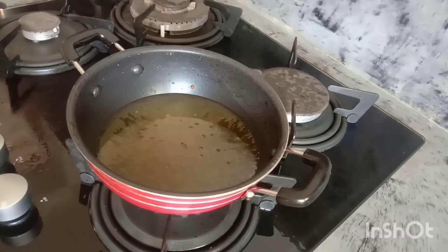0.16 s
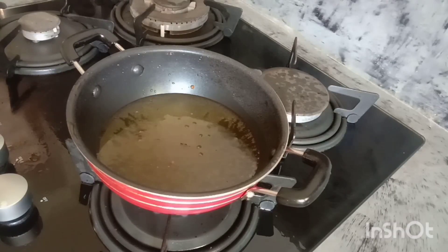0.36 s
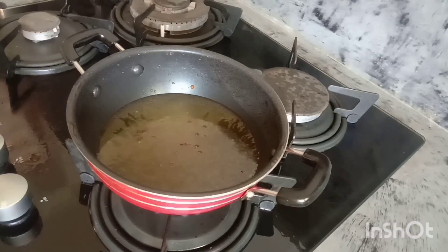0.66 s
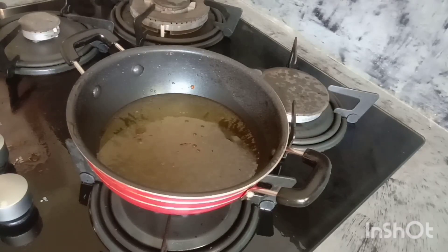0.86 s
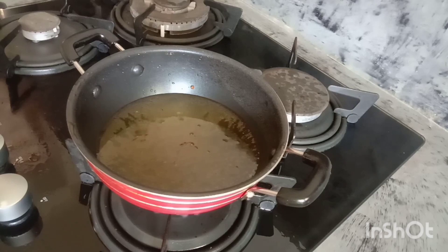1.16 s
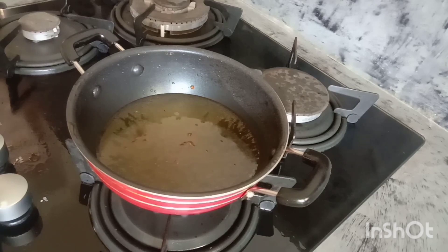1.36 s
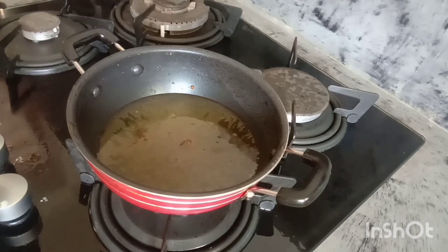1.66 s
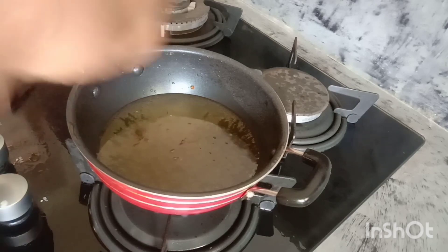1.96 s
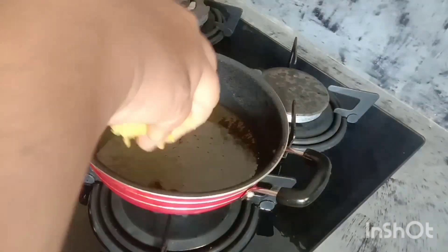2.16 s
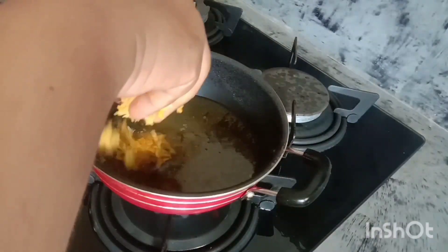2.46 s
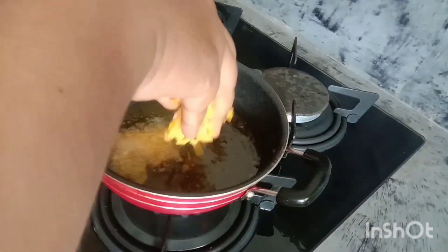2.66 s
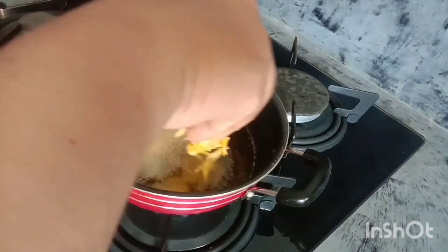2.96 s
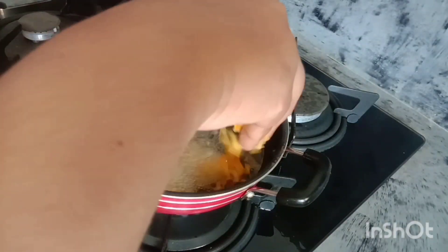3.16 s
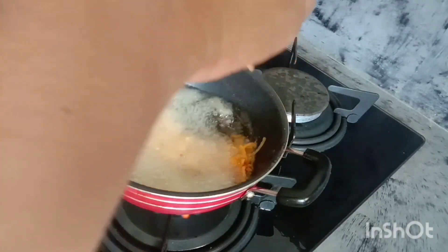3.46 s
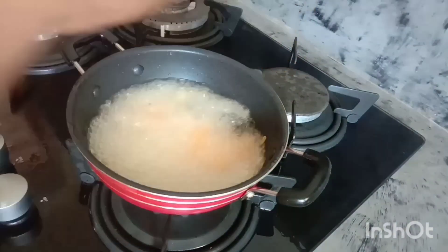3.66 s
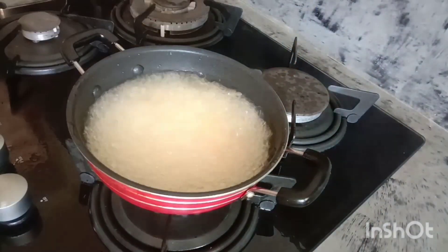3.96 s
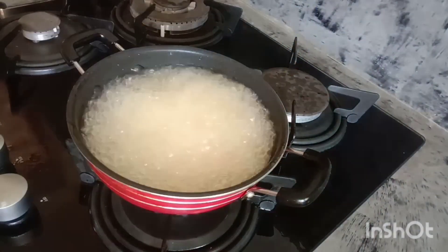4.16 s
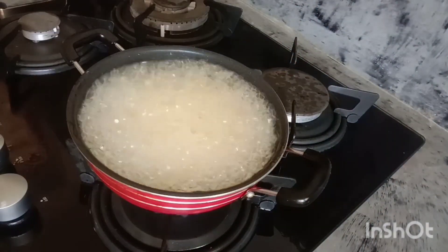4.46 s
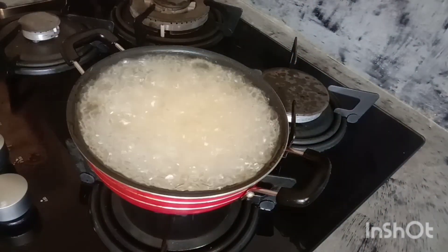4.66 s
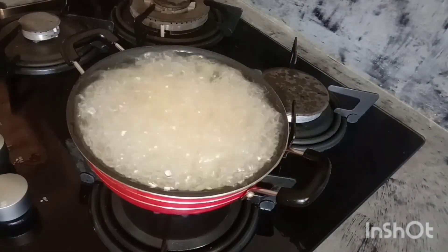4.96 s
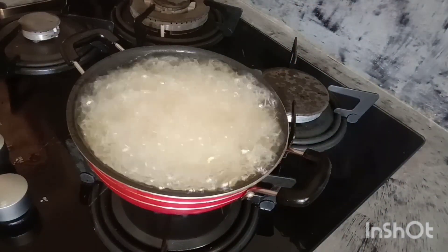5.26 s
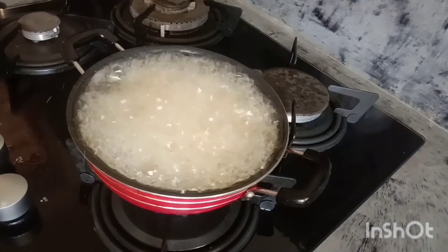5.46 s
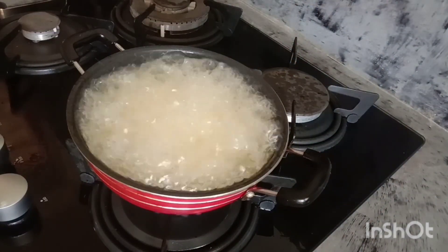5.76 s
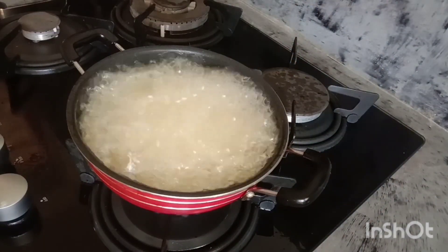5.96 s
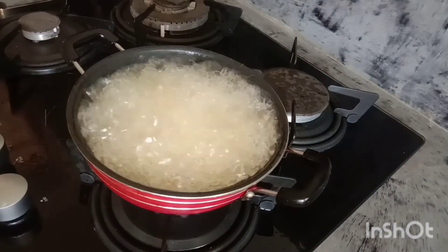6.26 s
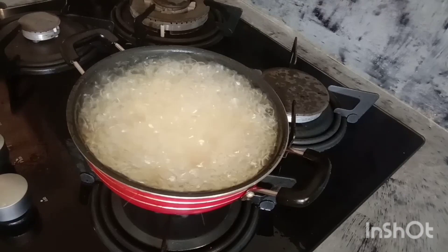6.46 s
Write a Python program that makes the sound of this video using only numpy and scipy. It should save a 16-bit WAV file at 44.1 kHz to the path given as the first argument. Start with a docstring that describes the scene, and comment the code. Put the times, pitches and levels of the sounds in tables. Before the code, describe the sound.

A scolding bird rasps over a faint gas burner; wet grated vegetable sputters into oil, foams and fizzes densely as an engine throb swells.

```python
"""From the start a gas burner hisses under hot oil, an engine outside throbs and slowly speeds up, and loud rasping
chirps, probably a scolding bird, ring in the hard-walled kitchen about twice a second: squeaks and hoarse notes.
Around 2 s grated radish drops into the pan and sputters; from 3.5 s the last handful flashes into a hiss and foams
up into soft, dense bubbling and fizz, built from thousands of short rings, with big bubbles and rushes standing out.
Shaped noise makes the burner and the rasp, wavering harmonics the engine; one dull microphone hears it all."""
import sys
import numpy as np
from scipy import signal
from scipy.fft import rfft, irfft
from scipy.io import wavfile
from scipy.ndimage import uniform_filter1d

SR = 44100
rng = np.random.default_rng(int(sys.argv[2]) if len(sys.argv) > 2 else 0)


def generate_wav(sig):
    """Save sig (samples, or channels by samples) to the path in sys.argv[1] as 16-bit PCM at SR."""
    pcm = np.round(np.clip(np.atleast_2d(sig).T, -1, 1) * 32767).astype(np.int16)
    wavfile.write(sys.argv[1], SR, pcm)


N = 292030
T = np.arange(N) / SR  # s


def undb(db):
    """Turn decibels into an amplitude gain."""
    return 10 ** (np.asarray(db) / 20)


def unit(x):
    """Scale to an rms of 1."""
    return x / np.sqrt(np.mean(np.abs(x) ** 2))


def spectrum_db(hz, points):
    """Read a curve of (f/Hz, level/dB) points on a log-frequency axis, flat beyond its ends."""
    f, db = np.transpose(points)
    return np.interp(np.log(np.maximum(hz, 1)), np.log(f), db)


def colour(x, points):
    """Filter a sound by the curve of the points and set it to an rms of 1."""
    gain = undb(spectrum_db(np.fft.rfftfreq(N, 1 / SR), points))
    return unit(irfft(rfft(x) * gain, N))


def walk(rate):
    """Smooth random drift of rms 1 that changes about rate times a second."""
    k = max(int(SR / rate), 1)
    smooth = uniform_filter1d(rng.standard_normal(N), k, mode="wrap")
    return unit(uniform_filter1d(smooth, k, mode="wrap"))


def scatter(width_hz, order):
    """Random amplitude and phase that smear a tone into a band of the given width."""
    noise = rng.standard_normal(N) + 1j * rng.standard_normal(N)
    lowpass = signal.butter(order, width_hz / 2, fs=SR, output="sos")
    return unit(signal.sosfilt(lowpass, noise))


def swell(t, length, rise, fall):
    """Grow softly, hold until length, then die away exponentially."""
    grow = 1 - np.exp(-(np.maximum(t, 0) / rise) ** 2)
    return grow * np.exp(-np.maximum(t - length, 0) / fall)


def bubbles(count, low_hz, high_hz, cycles, spread_db, glide):
    """Short ringing bubbles of random size, each rising in pitch as it nears the surface."""
    when, pitch, size = rng.random((count, 3)).T[:, :, None]
    hz = low_hz + (high_hz - low_hz) * pitch
    n = np.arange(int(cycles * SR / low_hz))
    age = n * hz / SR / cycles  # 1 after the given number of cycles
    envelope = (1 - np.exp(-age / 0.11)) * np.exp(-5 * age)
    ring = envelope * np.sin(2 * np.pi * cycles * age * (1 + glide * age / 2))
    gain = undb(-spread_db * np.log(1 - .995 * size)) * np.sqrt(hz)
    places = (when * N).astype(int) + n
    return np.bincount(places.ravel(), (gain * ring).ravel(), N)[:N]


def burner(tone_hz=476, tone_db=-68, jet_hz=1238, jet_db=-74):
    """The gas flame's low rush is shaped noise, with a faint wavering tone and a breathy ring from the jet."""
    # colour of the rush: f/Hz, relative level/dB
    rush_colour = [(20, -15.5), (45, -23.5), (75, -0.5), (130, 0.5), (250, 2), (420, 0), (560, -3),
                   (720, -9), (1700, -12), (2500, -20.5), (4000, -32.5), (7500, -50), (9000, -28.5),
                   (14000, -23)]
    # moments when the flame's tone swells: t/s, length/s, level/dB
    tone_swells = [(0.402, 0.054, -55), (0.535, 0.062, -56.5), (1.178, 0.044, -51.5)]
    rush = colour(rng.standard_normal(N), rush_colour) * undb(-56 + walk(rate=24))
    tone = np.real(scatter(width_hz=11.5, order=2) * np.exp(2j * np.pi * tone_hz * T))
    jet = np.real(scatter(width_hz=68, order=2) * np.exp(2j * np.pi * jet_hz * T))
    faint_tone = undb(tone_db) * unit(tone * undb(4 * walk(rate=36.0)))
    breathy_jet = undb(jet_db) * unit(jet * undb(3.1 * walk(rate=46)))
    swells = sum(undb(db) * swell(T - s, length, rise=0.01, fall=0.0066) for s, length, db in tone_swells)
    swelling_tone = swells * np.sqrt(2) * np.sin(2 * np.pi * tone_hz * T)
    return rush + swelling_tone + faint_tone + breathy_jet


def engine(waver_db=3.0, rumble_db=-21, leak_db=-13, leak_wander_db=7):
    """Slow firings whose low harmonics come through the walls, wander in level and boom in three house resonances."""
    # engine speed before a slight waver: t/s, firing rate/Hz
    speed = [(0, 21.66), (2.2, 21.8), (2.7, 22.41), (3.42, 22.06), (4.03, 23.17), (4.39, 23.27),
             (4.9, 23.86), (5.52, 24.34), (5.9, 24.52), (6.26, 25.2), (6.62, 25.4)]
    # levels of the three booms: t/s, deep/dB, middle/dB, upper/dB
    boom_levels = [(0.0, -83, -71, -86), (0.41, -62, -63.5, -62), (1.12, -85.5, -74, -85),
                   (1.8, -81, -69, -65.5), (2.05, -77, -64, -53), (2.4, -75, -60, -54),
                   (2.54, -60, -51, -55.5), (2.7, -73, -57, -50), (2.93, -78, -65, -55),
                   (3.11, -65, -52, -50.5), (3.48, -65, -48.5, -57.5), (3.67, -72, -68, -42.5),
                   (3.88, -72, -48, -53), (3.98, -64, -38.5, -48.5), (4.4, -52.5, -44.5, -44),
                   (4.7, -52, -38, -52), (5.05, -41, -46.5, -42.5), (5.33, -51, -47, -56),
                   (5.5, -49, -55, -41), (5.72, -54, -39, -47), (5.92, -47, -47.5, -50),
                   (6.13, -39, -47.5, -43), (6.3, -40, -38, -48), (6.62, -42, -38, -47)]
    # resonances of the house that the harmonics pass through: f/Hz, width/Hz, trim/dB
    house_booms = [(72.4, 28, -4), (122.2, 8.3, -4), (149.7, 25, -4)]
    # colour of the rumble through the walls: f/Hz, relative level/dB
    rumble_colour = [(22, -26), (40, -15.5), (50, 2.5), (100, 16.5), (190, 21), (250, -7.5), (400, -28.5)]
    hz = np.interp(T, *np.transpose(speed)) * (1 + 0.0038 * walk(rate=12.0))
    times, *levels = np.transpose(boom_levels)
    levels = [undb(np.interp(T, times, db)) for db in levels]
    orders = np.arange(2, 9)[:, None]
    # the harmonics stay nearly in step, so every firing is a throb
    drift = np.array([1.31 * walk(rate=1.72) for _ in orders])  # rad
    harmonics = np.sin(orders * 2 * np.pi * np.cumsum(hz) / SR + drift)
    # between the booms each harmonic comes and goes on its own
    leak = unit(sum(harmonic * undb(leak_wander_db * walk(rate=4.3)) for harmonic in harmonics[2:]))
    rumble = colour(rng.standard_normal(N), rumble_colour)
    out = (undb(leak_db) * leak + undb(rumble_db) * rumble) * np.linalg.norm(levels, axis=0)
    for (centre, width, db), level in zip(house_booms, levels):
        gains = 1 / (1 + (2 * (orders * hz - centre) / width) ** 2)
        boom = unit((gains * harmonics).sum(0) / np.linalg.norm(gains, axis=0))
        out += level * undb(db + waver_db * walk(rate=12.5)) * boom
    return out


def pops():
    """Drops of water burst in the oil, each a very short decaying ring."""
    # single pops: t/s, level/dB, ring f/Hz, decay/s
    oil_pops = [(0.346, -42, 5870, 0.00049), (5.587, -20, 3520, 0.0041)]
    out, t = np.zeros(N), T[:SR // 20]
    for start, level_db, hz, decay in oil_pops:
        i = int(start * SR)
        out[i:i + len(t)] += undb(level_db) * np.exp(-t / decay) * np.sin(2 * np.pi * hz * t)
    return out


def sputter():
    """Wet shreds spit as they are let into the hot oil: a swell of bright, short rings."""
    # t/s, length/s, level/dB
    sputter_timing = (2.43, 0.97, -60)
    start, length, level_db = sputter_timing
    spits = unit(bubbles(count=2500, low_hz=1366, high_hz=2970, cycles=22, spread_db=2.0, glide=0.14))
    return spits * undb(level_db) * swell(T - start, length, rise=0.27, fall=.1)


def flare():
    """The last handful hits the oil and flashes into a short crackling hiss of very brief rings."""
    # t/s, length/s, level/dB
    flash_timing = (3.558, 0.093, -38.5)
    # colour of the crackle: f/Hz, relative level/dB
    flash_colour = [(2000, -8.5), (3300, -3), (5000, -4), (6600, 8.5), (7400, -6.5), (8100, -19),
                    (10000, -11), (13000, -31)]
    start, length, level_db = flash_timing
    grains = bubbles(count=16000, low_hz=2000, high_hz=13200, cycles=4.5, spread_db=-2.5, glide=.1)
    return colour(grains, flash_colour) * undb(level_db) * swell(T - start, length, rise=0.014, fall=0.055)


def frying(gurgle_db=-6.5, hot_oil_db=-75, fizz_rise_s=0.73, drying_s=4.6):
    """Each handful swells into fizz and boil: steam leaves as a few deep gurgles and many bubbles in the foam."""
    # handfuls of radish: t/s, bubbling level/dB, fizz level/dB, time to come to the boil/s
    handfuls = [(2.05, -57, -61, 0.33), (3.55, -49, -51.5, 0.63)]
    # colours of the deep gurgles, the foam and the fizz: f/Hz, relative level/dB
    gurgle_colour = [(200, 0.5), (330, -1.5), (600, -4.5)]
    foam_colour = [(150, 6), (300, 15), (450, -9), (610, -5.5), (720, -6), (1000, -1), (1400, -2),
                   (1800, -3), (2200, -27), (2700, -12.5), (3400, -2), (4200, -22)]
    fizz_colour = [(2000, -2.5), (3300, -15.5), (4300, -10), (5200, -3.5), (6000, -0.5), (7100, -5),
                   (8100, -19), (10000, -15), (14000, -17.5)]
    # all slowly dies as the water boils off
    boil = np.linalg.norm([undb(db) * swell(T - s, boil_s, rise=boil_s, fall=drying_s)
                           for s, db, _, boil_s in handfuls], axis=0)
    fizz = np.linalg.norm([undb(db) * swell(T - s, boil_s, rise=fizz_rise_s, fall=drying_s)
                           for s, _, db, boil_s in handfuls], axis=0)
    deep = bubbles(count=330, low_hz=186.6, high_hz=682, cycles=22.5, spread_db=4.0, glide=0.1)
    foam = bubbles(count=7000, low_hz=588.7, high_hz=3987, cycles=31, spread_db=1.1, glide=0.062)
    fine = bubbles(count=20000, low_hz=2020, high_hz=13600, cycles=3.3, spread_db=1.0, glide=0.075)
    # the gurgles surge as the foam tops out, 0.97 s after the last handful
    surge = 1 + 0.31 * swell(T - handfuls[-1][0] - 0.97, 1, rise=0.14, fall=0.13)
    lumps = unit(undb(2.0 * walk(rate=12)))
    gurgling = undb(gurgle_db) * surge * colour(deep, gurgle_colour) * lumps
    bubbling = (colour(foam, foam_colour) + gurgling) * boil * undb(1.0 * walk(rate=11.0))
    fizzing = colour(fine, fizz_colour) * (undb(hot_oil_db) + fizz) * undb(1.0 * walk(rate=19))
    return bubbling + fizzing


def blips(rise_s=0.0017, decay_s=0.027, glide_per_s=1.6):
    """Big steam bubbles stand out of the foam, ringing low and rising in pitch as they surface."""
    # t/s, starting f/Hz, level/dB
    big_bubbles = [(4.101, 301, -44), (4.25, 497, -47), (4.59, 396, -48), (4.748, 359, -42.5),
                   (4.781, 238, -38.5), (4.86, 506, -55), (4.949, 315, -45.5), (5.059, 256, -45),
                   (5.17, 226, -40.5), (5.32, 470, -44.5), (5.72, 258, -47), (5.91, 297, -47.5)]
    out, t = np.zeros(N), T[:SR // 5]
    for start, hz, level_db in big_bubbles:
        i = int(start * SR)
        ring = np.sin(2 * np.pi * hz * t * (1 + glide_per_s * t / 2))
        out[i:i + len(t)] += undb(level_db) * ring * swell(t, 2 * rise_s, rise=rise_s, fall=decay_s)
    return out


def foam_rushes():
    """Patches of foam give way, and many bubbles of much the same size ring together."""
    # t/s, length/s, level/dB
    rushes = [(5.246, 0.079, -45.5), (5.756, 0.19, -50.5), (6.28, 0.18, -52.5)]
    ringing = unit(bubbles(count=6000, low_hz=1410, high_hz=1885, cycles=54, spread_db=2.2, glide=.03))
    return ringing * sum(undb(db) * swell(T - s, length, rise=0.047, fall=0.022) for s, length, db in rushes)


NOTE_FALL_S = 0.018  # shared by the hoarse notes and the squeak's overtone


def squeak(t, length, wait, thin, whistle_hz, whistle_s, whistle_db, lower_db, overtone_hz, overtone_db):
    """A call opens in two thin voices, a sinking whistle and a lower one; a high overtone lingers into the note."""
    sag_hz, sag_s, lower_hz = 383, 0.037, 3027
    rise_s, fall_s = 0.032, 0.021
    sinking = whistle_hz + sag_hz * (np.exp(-t / sag_s) - .5)
    turns = np.cumsum(sinking) / SR, lower_hz * t, overtone_hz * t
    # a steady share at -3 dB keeps the smeared voices partly pure
    whistle, lower, overtone = ((thin + undb(-3)) * np.exp(2j * np.pi * np.array(turns))).real
    whistle *= undb(whistle_db) * swell(t, whistle_s, rise=rise_s, fall=fall_s)
    lower *= undb(lower_db) * swell(t, wait, rise=rise_s, fall=fall_s)
    overtone *= undb(overtone_db) * swell(t - wait / 2, 0.52 * length, rise=0.011, fall=NOTE_FALL_S)
    return whistle + lower + overtone


def hoarse_note(t, length, pitch_hz, slide, rise, roughen_s, clear, hoarse, octave_db=-24):
    """The note breaks in high and fairly clear, then sinks and turns hoarse as its band widens."""
    age = np.maximum(t, 0)
    hz = pitch_hz * (0.97 + slide * np.exp(-age / .045))  # starts sharp, settles just under the listed pitch
    clarity = np.exp(-age / roughen_s)
    smear = np.sqrt(clarity) * clear + np.sqrt(1 - clarity) * hoarse
    voice = smear * np.exp(2j * np.pi * np.cumsum(hz) / SR)
    voice = voice + undb(octave_db) * voice ** 2 / np.abs(voice)
    return np.sqrt(2) * voice.real * swell(t, length, rise=rise, fall=NOTE_FALL_S)


def streaks(x, depth_db=3.5, width_hz=139):
    """Random narrow resonances and dips across a sound's spectrum."""
    spectrum = rfft(x)
    k = max(int(width_hz * len(x) / SR), 1)
    smooth = uniform_filter1d(rng.standard_normal(len(spectrum)), k)
    ripple = unit(uniform_filter1d(smooth, k))
    return irfft(spectrum * unit(undb(depth_db * ripple)), len(x))


def rasping(t, length, noise):
    """Noise with new resonant streaks swells around every chirp."""
    return streaks(noise) * swell(t, 0.74 * length, rise=0.02, fall=0.068)


def near_walls(x, count, reflection_db=-14):
    """A few random reflections within 1 to 5 ms comb a sound into strands; its level is kept."""
    out = x.copy()
    for lag in rng.integers(SR // 1100, SR // 200, count):
        out[lag:] += rng.choice([-1, 1]) * undb(reflection_db) * x[:-lag]
    return out * np.std(x) / np.std(out)


def chirps(flutter_db=0.45, grain_db=2):
    """Full calls, soft notes between them and a brief swishing sizzle of the radish share one fluttering voice
    of smeared tones and rasping noise."""
    # colours of the rasp and of the low grating: f/Hz, relative level/dB
    rasp_colour = [(1200, -25), (2000, -14), (2600, -3.5), (3300, -1), (4200, 2), (4750, -1.5), (5400, -4),
                   (6000, -4), (7000, -8.5), (8300, -20), (9000, -20), (9800, -24), (12000, -34),
                   (15400, -34)]
    grate_colour = [(1000, -23), (1500, -2.5), (2000, 1), (2500, -1), (3200, 2), (4500, -34.5)]
    # full calls, a two-voiced squeak that breaks into a hoarse falling note: t/s, length/s, wait for the note/s,
    # note pitch f/Hz, level/dB, whistle f/Hz, whistle length/s; then, re the call's level: whistle/dB,
    # lower voice/dB, overtone f/Hz (a pitch of its own), overtone/dB, rasp/dB, low grating/dB
    full_calls = [ (.002, 0.1, 0.041, 3690, -32, 4870, 0.049, -1.5, -7, 6330, -20, -8.5, -19.5),
                  (0.738, 0.14, 0.051, 3747, -34.5, 4940, 0.062, 1.5, -35, 6530, -11.5, -21, -22.5),
                  (1.186, .16, 0.04, 3604, -32, 5230, 0.087, -10, -2.5, 6200, -29, -6.5, -31),
                  (1.651, 0.16, 0.047, 3730, -35.5, 4800, 0.085, -5, -8, 6120, -10.5, -8, -25.5),
                  (2.065, 0.15, 0.051, 3680, -31.5, 4670, 0.054, -8.5, -5.5, 6060, -16, -11, -14),
                  (3.268, 0.2, 0.062, 3438, -35, 4740, 0.035, -10, -1.5, 6100, -23, -13.5, -19),
                  (3.689, 0.16, 0.044, 3708, -32, 4440, 0.16, -6.5, -2, 6140, -11, -12, -21),
                  (4.149, 0.15, 0.055, 3890, -32.5, 4870, 0.026, -2, -8, 6130, -19, -9, -24.5),
                  (4.694, 0.14, .04, 3784, -32.5, 4830, 0.03, -2.5, -6.5, 6150, -26, -7, -28),
                  (5.079, 0.16, 0.044, 3800, -34, 4910, 0.022, 8.5, -24, 6950, -11.5, -5.5, -31),
                  (5.477, 0.19, 0.078, 3440, -36, 4630, 0.07, -2.5, -6, 6100, -10.5, -5.5, -24),
                  (5.987, 0.14, 0.065, 3493, -29, 4960, 0.066, -9.5, -5.5, 6170, -28, -5, -23),
                  (6.581, .12, .042, 3700, -32, 4780, 0.029, 3, -12, 6120, -11.5, -9.5, -26)]
    # short soft notes with no whistle, and near 2.95 s three rows that make the swishing sizzle of the radish
    # in the oil: t/s, length/s, pitch f/Hz, level/dB, rasp re that level/dB
    soft_sounds = [ (1.036, 0.06, 3497, -42, -8.5), (1.153, 0.054, 3350, -40.5, -5.5),
                   (1.851, 0.088, 3810, -43, 3.5), (2.518, 0.064, 3536, -41, -12.5),
                   (2.79, 0.077, 3420, -45.5, -9), (2.93, 0.092, 3770, -50.5, -7),
                   (2.955, 0.25, 2605, -53.5, -18), (2.987, 0.13, 4540, -49, -22),
                   (3.065, 0.16, 3645, -41, -15.5), (3.878, 0.034, 3850, -40.5, 1),
                   (5.272, 0.074, 3630, -42, 2.5)]
    thin = np.array([scatter(width_hz=470, order=3) for _ in range(3)])
    hoarse = scatter(width_hz=954, order=6)
    clear = scatter(width_hz=320, order=3)
    crackle = undb(grain_db * walk(rate=810))
    rasp = colour(rng.standard_normal(N) * crackle, rasp_colour)
    grate = colour(rng.standard_normal(N), grate_colour)
    flutter = unit(undb(flutter_db * walk(rate=280)))
    out = np.zeros(N)
    # every chirp gets new reflections, so each is combed differently
    for start, length, wait, pitch_hz, level_db, *voices, rasp_db, grate_db in full_calls:
        span = (T >= start) & (T < start + .45)
        t = T[span] - start
        sound = hoarse_note(t - wait, length - wait, pitch_hz, slide=.12, rise=0.0069, roughen_s=0.041,
                            clear=clear[span], hoarse=hoarse[span])
        sound += squeak(t, length, wait, thin[:, span], *voices)
        sound += rasping(t, length, undb(rasp_db) * rasp[span] + undb(grate_db) * grate[span])
        out[span] += undb(level_db) * near_walls(sound * flutter[span], count=3)
    for start, length, pitch_hz, level_db, rasp_db in soft_sounds:
        span = (T >= start) & (T < start + .45)
        t = T[span] - start
        sound = hoarse_note(t, length, pitch_hz, slide=0.076, rise=0.22 * length, roughen_s=0.11,
                            clear=clear[span], hoarse=hoarse[span])
        sound += rasping(t, length, undb(rasp_db) * rasp[span])
        out[span] += undb(level_db) * near_walls(sound * flutter[span], count=3)
    return out


def kitchen(x, t60_s=0.73, echo_db=-1.5, treble_decay=1.64, build_s=0.035):
    """Direct sound plus a dense echo off hard walls, whose treble dies sooner."""
    t = T[:SR]
    noise = rng.standard_normal(SR)
    low = signal.sosfiltfilt(signal.butter(4, 4500, fs=SR, output="sos"), noise)
    fade_db = -60 * t / t60_s
    tail = low * undb(fade_db) + (noise - low) * undb(fade_db * treble_decay)
    tail *= 1 - np.exp(-t / build_s)
    echo = signal.fftconvolve(x, tail / np.linalg.norm(tail))[:N]
    return (x + undb(echo_db) * echo) / np.hypot(1, undb(echo_db))


def scene():
    """Chirps and most of the pan ring in the kitchen; big bubbles, engine and burner stay dry; both channels match."""
    ringing = kitchen(pops() + sputter() + flare() + frying() + foam_rushes() + chirps())
    mix = burner() + engine() + blips() + ringing
    return np.array([mix, mix])


def record(dry):
    """The microphone adds steady resonances and dips, a dull top and a steep cut-off at 15.7 kHz."""
    # resonances and dips on the way to the microphone: f/Hz, width/Hz, level/dB
    resonances = [(1240, 90, 9), (3120, 40, 6), (3275, 30, 3), (3490, 60, 4), (3895, 50, 4),
                  (4350, 250, -2), (4560, 80, 2), (4840, 90, 2), (6570, 380, -10), (7350, 500, 3),
                  (15400, 1500, 10)]
    # microphone response: f/Hz, level/dB
    mic_response = [(7700, -1), (8450, -4), (8900, -12.5), (11000, -18.5)]
    hz = np.fft.rfftfreq(N, 1 / SR)
    db = spectrum_db(hz, mic_response)
    db = db + sum(peak_db / (1 + (2 * (hz - f) / width) ** 2) for f, width, peak_db in resonances)
    cutoff = signal.ellip(10, .2, 70, 15700, fs=SR, output="sos")
    return signal.sosfilt(cutoff, irfft(rfft(dry) * undb(db), N))


dry = scene()
out = record(dry)
generate_wav(out)
```